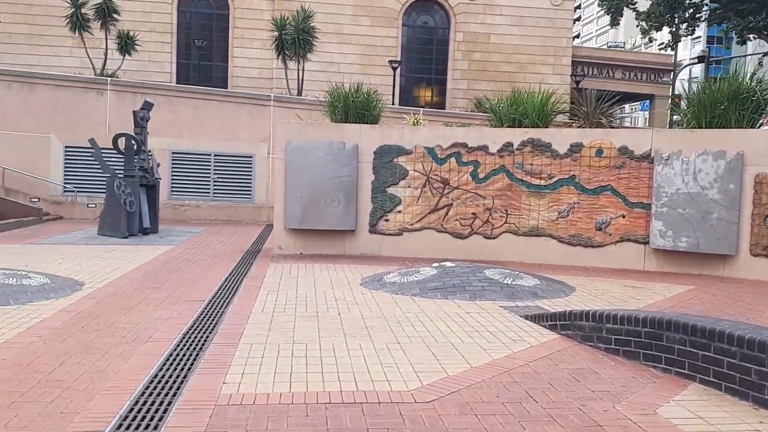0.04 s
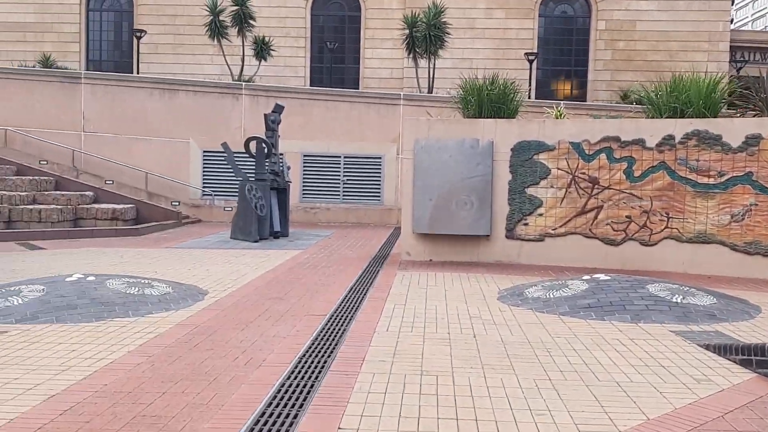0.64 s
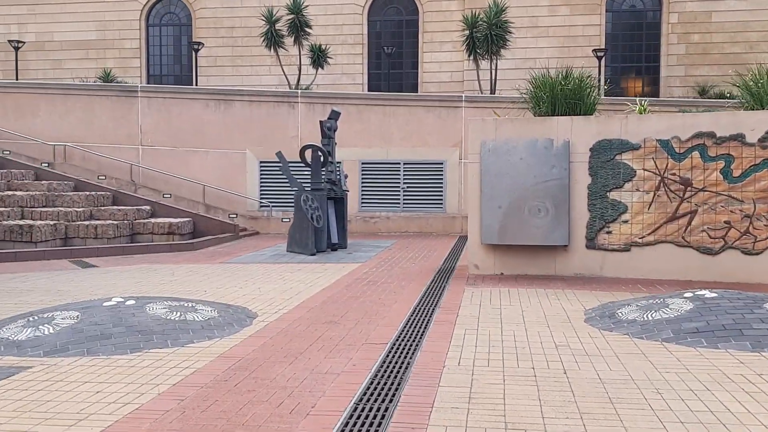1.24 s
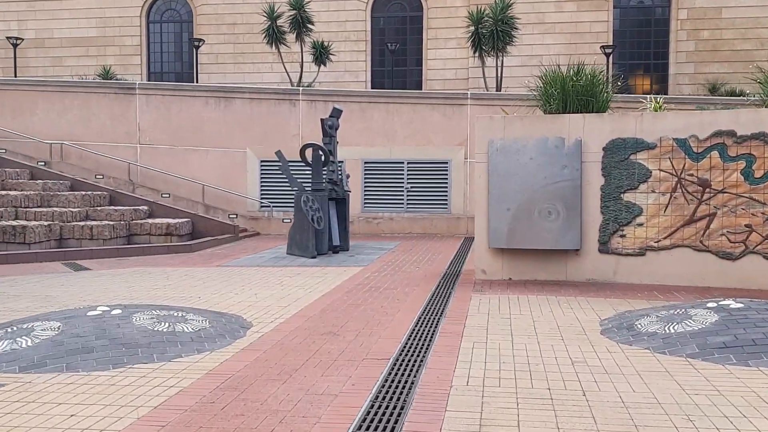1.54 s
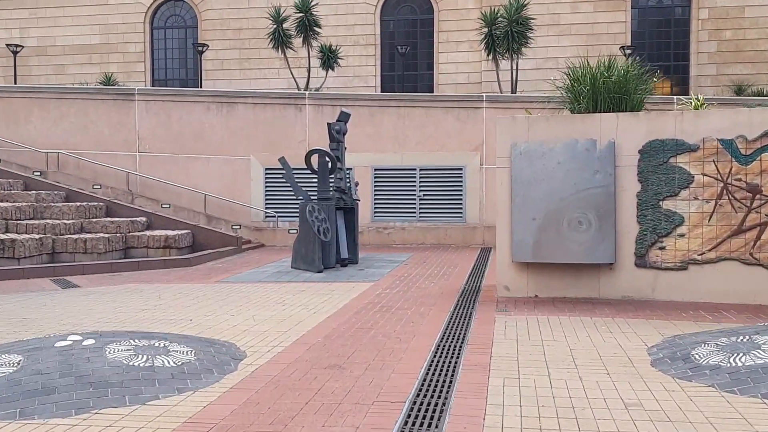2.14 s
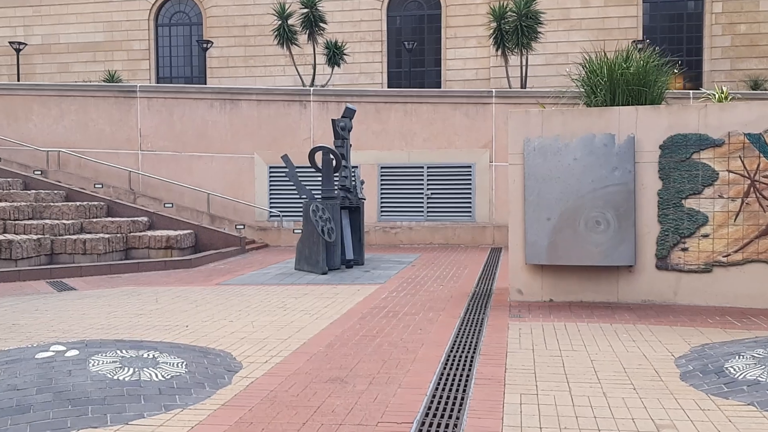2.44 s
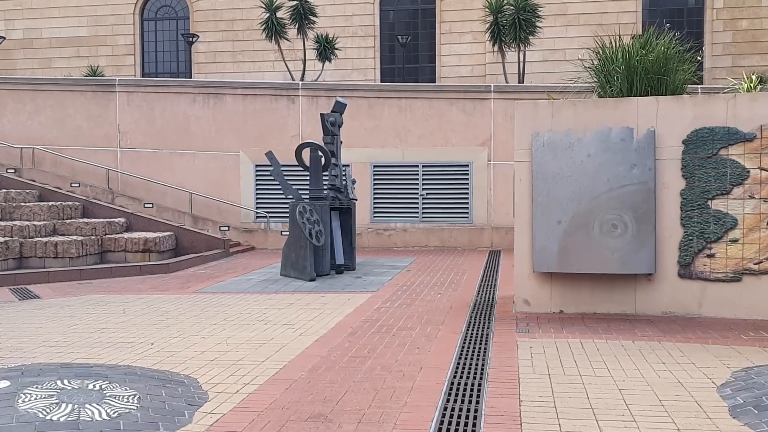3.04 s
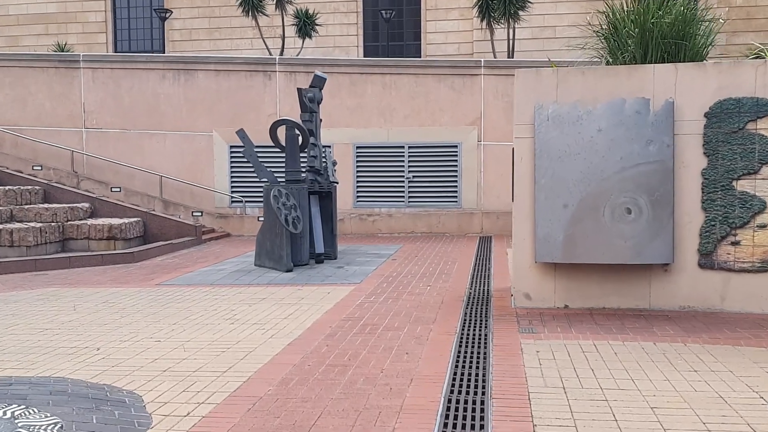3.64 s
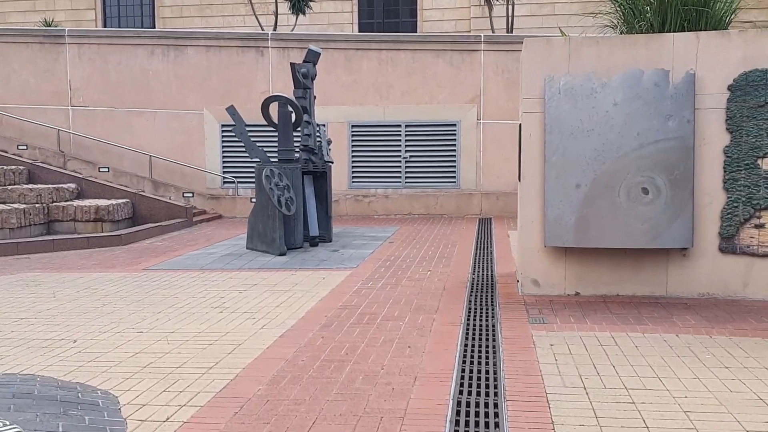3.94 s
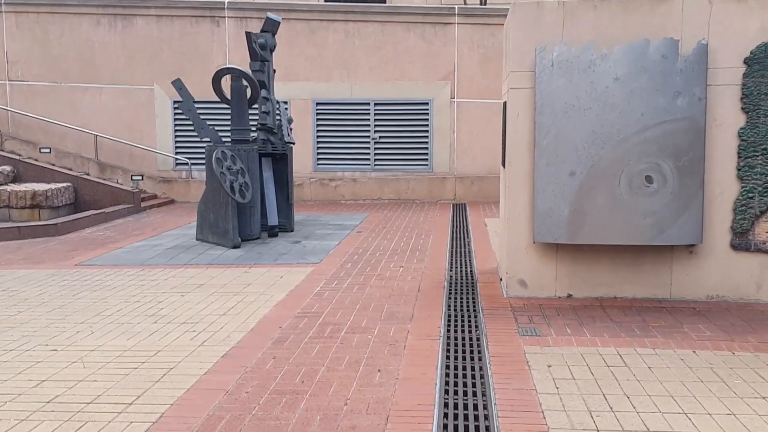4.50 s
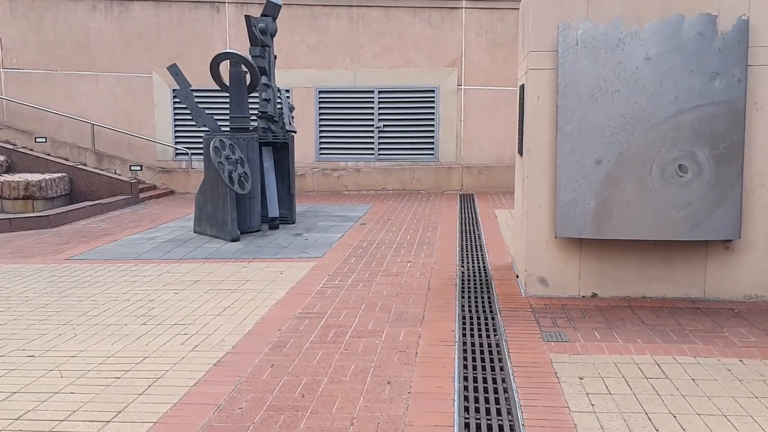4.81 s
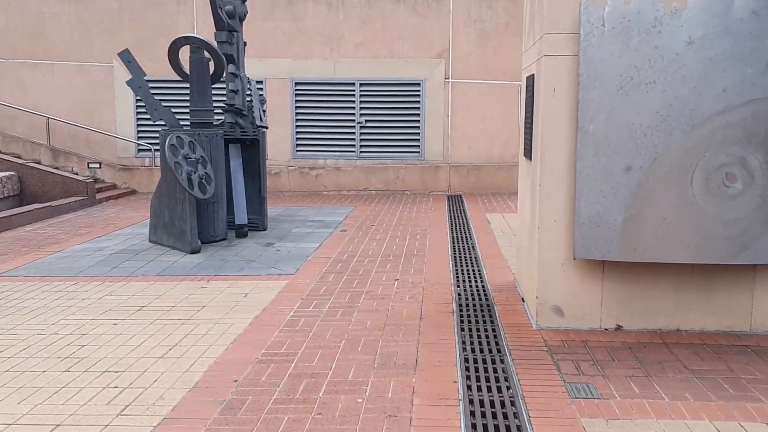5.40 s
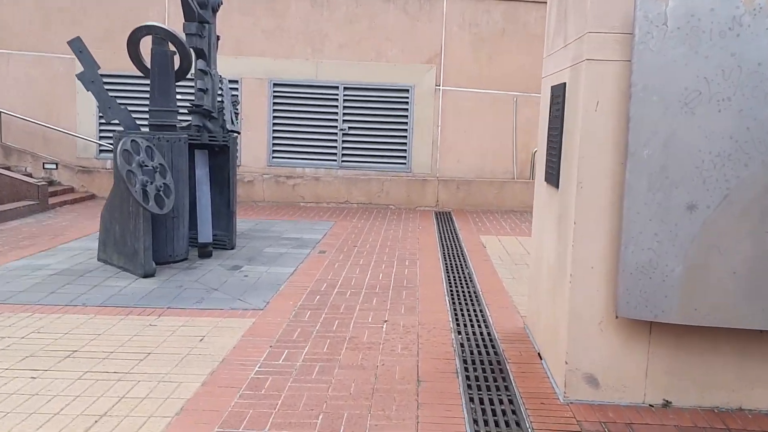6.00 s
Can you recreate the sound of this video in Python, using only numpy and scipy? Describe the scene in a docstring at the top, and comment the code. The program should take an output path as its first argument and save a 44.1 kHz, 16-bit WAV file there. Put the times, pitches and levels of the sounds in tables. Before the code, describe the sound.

A steady, low city hum with a faint far hiss fills a walled plaza throughout. Soft soles scuff quietly on brick close to the microphone, about two steps a second. In the first second, small birds give faint hoarse calls, a quick twitter and a short arched chirp, lightly echoed by the walls. The chirp returns from the left at about 2.5, 3 and 3.4 seconds. At about 3.8 seconds a loose metal drain grate clanks underfoot, rattling and ringing briefly, by far the loudest sound. It knocks dully at 4.4 seconds, then more firmly around 4.9 as it settles. From about 4.8 seconds a light breeze rumbles on the microphone in small gusts. Grit snaps sharply under a shoe near 5.3 seconds, and one more chirp starts at the very end, around 6.2 seconds.

```python
"""A loose metal drain grate clanks under a walker's foot, rings, then knocks back into its seat.
Soft soles scuff the bricks of a walled, paved plaza, and grit snaps under them.
Small birds whistle from above over the steady hum of a city, and the stone walls answer.
Late on a breeze buffets the two microphone ports, which colour the treble differently."""
import sys
import numpy as np
from scipy import signal
from scipy.fft import rfft, irfft, next_fast_len
from scipy.io import wavfile
from scipy.ndimage import uniform_filter1d, minimum_filter1d, map_coordinates

SR = 44100
rng = np.random.default_rng(int(sys.argv[2]) if len(sys.argv) > 2 else 0)


def wav_out(sig):
    """Save sig, one row per channel (or a flat mono array), as 16-bit PCM at SR to the path in sys.argv[1]."""
    wavfile.write(sys.argv[1], SR, np.round(np.clip(np.atleast_2d(sig).T, -1, 1) * 32767).astype(np.int16))


N = 276066

# Levels are relative: each layer has its own trim in the mix.
# The city bed. Each row: time in seconds, traffic level in dB, far hiss level in dB.
CITY_LEVELS = [(0, -47.5, -51), (1.1, -49, -50.5), (1.6, -49, -52.5), (2.2, -46.5, -53),
               (3.3, -48.5, -53.5), (4.7, -50, -55), (5.2, -47.5, -55.5), (5.75, -47, -52),
               (6.26, -47, -54)]
# Noise colours of the bed. Each row: frequency in Hz, level per Hz in dB.
TRAFFIC_COLOUR = [(15, -53), (25, -29), (70, -1), (107, -2), (139, -3.5), (173, -3), (209, -2), (394, -4.5),
                  (528, -9), (782, -13.5), (1030, -18.5), (1500, -17), (1950, -25), (3300, -120)]  # low traffic
HISS_COLOUR = [(530, -12), (900, -2), (1220, -7.5), (1510, -6), (1830, -7), (2040, -4.5), (3030, -3),
               (3320, 1.5), (4480, -15), (4860, -12.5), (7500, -45), (9750, -90), (16500, -120)]  # tyres and leaves
EDDY_COLOUR = [(15, -46), (25, -16), (92, -1), (138, 0), (255, -7), (350, -17), (557, -26), (900, -27),
               (1170, -57), (1980, -120)]  # wind on the ports
# The breeze, picking up near the wall. Each row: time in seconds, level in dB.
BREEZE_LEVELS = [(0, -58), (1.15, -63), (1.8, -49), (2.8, -62), (3.7, -48.5), (4.2, -56.5), (4.7, -56),
                 (4.83, -35), (5.6, -41.5), (6.26, -43)]
# Single gusts. Each row: peak time in seconds, level in dB, half-length in seconds.
GUSTS = [(0.213, -48.5, 0.048), (0.735, -42.5, 0.081), (1.44, -48, .04), (3.431, -37.5, 0.024),
         (5.326, -35.5, 0.027), (5.751, -34.5, 0.028), (5.945, -36.5, 0.027), (6.247, -32.5, 0.023)]

# Hoarse far birds. Each row: start and length in seconds, first and last pitch in Hz, level in dB.
FAR_CALLS = [(0.057, 0.2, 1783, 2003, -46), (.25, 0.055, 1835, 2090, -42), (0.827, .061, 1463, 1820, -43),
             (0.88, 0.083, 3490, 3170, -44), (3.341, 0.076, 1970, 1617, -39)]
# The turns of one bird's zigzag. Each row: time in seconds, pitch in Hz.
TWITTER_TURNS = [(.355, 5800), (.385, 5400), (.402, 4000), (.425, 4200), (.446, 6000), (.458, 4500),
                 (.488, 3450), (.525, 4500)]
# Another bird's arched notes. Each row: crest time in seconds, level in dB, pitch ratio.
CHIRPS = [(.755, -42, .985), (2.549, -41, 1.005), (3.034, -41.5, .99), (3.371, -42, .985),
          (6.267, -34.5, .98)]

# Footsteps, about two a second.
# Each row: peak time in seconds, level in dB, half-length in seconds, share of sand from 0 to 1.
STEPS = [(0.426, -53.5, 0.034, 0.26), (1.24, -51, 0.034, 0.15), (1.782, -52.5, .014, 0.47),
         (2.3, -55, 0.029, 0), (2.805, -53.5, 0.038, .2), (3.276, -56.5, 0.065, 0.12),
         (3.797, -60, 0.044, 0.46), (4.317, -56, .025, 0.33), (4.822, -46, 0.015, 0.22),
         (5.378, -54.5, .029, 0.18), (5.782, -58, 0.12, 0)]
# Noise colours of a scuff. Each row: frequency in Hz, level per Hz in dB.
RUBBER_COLOUR = [(200, -20), (900, -8), (1700, -2), (2150, -6), (2700, -3), (3000, -4), (3400, 0),
                 (3900, -8), (5000, -17), (7000, -40), (15000, -50)]  # the sole dragging
SAND_COLOUR = [(1000, -18.5), (3000, 2.5), (4500, -2), (5700, 7.5), (7300, -27), (9000, -27),
               (11500, -12.5), (15000, -26)]  # the grit under it

# Hits underfoot. Each row: start in seconds, level in dB.
GRATE_SLAMS = [(3.8453, -10.5), (3.851, -9.5), (3.877, -15.5), (3.912, -19.5), (3.96, -28.5)]  # the grate rocking in its frame
GRIT_SNAPS = [(4.2105, -31), (5.2353, -32), (5.2642, -17.5), (5.3283, -42)]
# The seated grate's knocks. Each row: start in seconds, level in dB, low-pass cutoff in Hz.
GRATE_KNOCKS = [(4.446, -30.5, 650), (4.854, -21, 450), (4.87, -21, 4180), (4.92, -26.5, 2900)]
# Ringing modes. Each row: frequency in Hz, level in dB, nominal time to fall 60 dB in seconds.
LOOSE_MODES = [(241, -5, 0.27), (345, -5, 0.26), (381, -7, 0.26), (439, -6, 0.25), (578, -11, 0.24),
               (1088, -14, 0.23), (1173, 0, 0.22), (1220, -8, 0.22), (1299, -10, 0.22), (1340, -13, 0.22),
               (1420, -12, 0.22), (1598, -14, 0.22), (1858, -16, 0.21), (2407, -16, 0.21),
               (2446, -17, 0.21), (2570, -18, 0.2), (2604, -17, 0.2), (2794, -19, 0.2), (2856, -18, 0.2),
               (2986, -19, 0.2), (3075, -12, 0.2), (3137, -19, 0.2), (3175, -11, 0.2), (3239, -17, 0.2),
               (3295, -17, 0.2), (3379, -20, 0.2), (3639, -17, 0.2), (3793, -18, 0.19)]  # bars of the loose grate
GRIT_MODES = [(736, -14, 0.026), (1120, -17, 0.0098), (1660, -14.5, 0.017), (3380, -10, 0.015),
              (5130, -13, 0.0087)]  # a snapping grain
SEATED_MODES = [(298, -3, .11), (390, -6, .08), (500, -1, .08), (790, -13, .07), (950, -4, .07),
                (1460, 0, .1), (1690, -2, .1), (3430, -11, .08)]  # bars of the seated grate
# Noise colours of the hits. Each row: frequency in Hz, level per Hz in dB.
FRAME_COLOUR = [(35, -58), (60, -28), (172, -11), (229, -1), (377, -8), (445, -4), (778, -19), (1080, -13),
                (1170, 3), (1260, -10), (1380, -9), (1510, -17), (1630, -15), (2200, -22), (2860, -52),
                (4840, -120)]  # thud of the frame and its channel
CLINK_COLOUR = [(1000, -28), (1850, -7), (2200, -19.5), (2450, -6), (2800, -8.5), (3100, -5), (3400, -10.5),
                (3750, -8), (4200, -24), (5500, -28.5), (7400, -53), (11000, -53), (15500, -62.5)]  # metal on metal, also the crack of grit
KNOCK_COLOUR = [(35, -38.5), (60, -15), (177, -11.5), (297, 1), (437, -15.5), (962, -13), (1330, -21.5),
                (1470, -21), (3430, -21), (6000, -45), (7800, -87), (13200, -120)]  # thud of the seated grate

# The plaza's reverb. Each row: frequency in Hz, time to fall 60 dB in seconds.
PLAZA_DECAY = [(150, .7), (450, .9), (1200, .55), (3000, 1.5), (4200, 1.7), (5100, 1.4), (6200, .9),
               (9000, .5)]
# Reverb EQ. Each row: frequency in Hz, gain in dB.
WALK_ECHO_EQ = [(400, -15.5), (1200, -16), (3000, -30), (6000, -26)]  # sound from the ground is muffled on its way to the walls
CHIRP_ECHO_EQ = [(3600, -6.0), (5200, -12.5)]  # the long way round costs the note's top most
# Stereo width. Each row: frequency in Hz, left-right likeness from 0 to 1.
STEREO_LIKENESS = [(60, 0.97), (150, 0.96), (300, 0.95), (640, 0.68), (1400, 0), (3000, 0.18), (12000, 0)]
# The tone of the two ports. Each row: frequency in Hz, left minus right in dB.
PORT_BALANCE = [(60, -2), (300, -.5), (1200, -.5), (2000, -3), (2800, -6), (3350, -10), (4100, 0),
                (4800, 8), (5800, 10), (7500, 3), (14000, 1.5)]


def amp(db):
    """Decibels to gain."""
    return 10 ** (np.asarray(db) / 20)


def unit(x):
    """Scale to rms 1."""
    return x / np.sqrt(np.mean(x ** 2) + 1e-20)


def along(points, hz):
    """Read (Hz, value) points on a log frequency axis."""
    freqs, values = np.transpose(points)
    return np.interp(np.log(hz + 1), np.log(freqs + 1), values)


def curves(rows):
    """One automation curve for each column after the time."""
    times, *columns = np.transpose(rows)
    return [np.interp(np.arange(N) / SR, times, column) for column in columns]


def wobble(rate, size=N):
    """A smooth random curve, rate knots a second."""
    knots = rng.standard_normal(int(size * rate / SR) + 4)
    return map_coordinates(knots, [np.arange(size) * rate / SR])


def swell(s, db, half_length):
    """A bell-shaped rise and fall in gain around time s."""
    return amp(db) * np.exp(-((np.arange(N) / SR - s) / half_length) ** 2 / 2)


def filtered(x, response):
    """Shape x with a gain that depends on frequency."""
    n = x.shape[-1]
    padded = next_fast_len(n + 8192)
    return irfft(rfft(x, padded) * response(np.fft.rfftfreq(padded, 1 / SR)), padded)[..., :n]


def eq(x, points):
    """Equalise x along (Hz, dB) points."""
    return filtered(x, lambda hz: amp(along(points, hz)))


def add(track, s, sound):
    """Mix a sound into a track from time s on."""
    part = track[..., round(s * SR):][..., :sound.shape[-1]]
    part += sound[..., :part.shape[-1]]


def diffuse(pair, directness=1):
    """Make two unrelated signals alike in the bass; direct sound stays alike higher up."""
    def mid_side_gains(hz):
        angle = np.arccos(np.clip(along(STEREO_LIKENESS, hz / directness), -1, 1)) / 2
        return np.array([np.cos(angle), np.sin(angle)])
    mid, side = filtered(pair, mid_side_gains)
    return np.array([mid + side, mid - side])


def noise(colour, size=N, directness=1):
    """Stereo noise of rms 1 with the given colour."""
    return unit(diffuse(eq(rng.standard_normal((2, size)), colour), directness))


def city():
    """The bed: traffic hum, far hiss, one droning engine and the microphone's own faint hiss."""
    traffic_db, hiss_db = curves(CITY_LEVELS)
    drift_db = .7 * wobble(5)
    traffic = amp(traffic_db + 4 + drift_db) * noise(TRAFFIC_COLOUR)
    hiss = amp(hiss_db + 5.5 + .92 * wobble(7.8)) * noise(HISS_COLOUR)
    engine_hz = 146 + 1.39 * wobble(4.13)
    engine_gain = amp(-56.5) + swell(s=3.2, db=-50, half_length=.4)
    engine = engine_gain * amp(1.5 * wobble(15)) * np.sin(2 * np.pi * np.cumsum(engine_hz) / SR)
    mic_hiss = amp(-74) * unit(rng.standard_normal((2, N)))
    return traffic + hiss + engine + mic_hiss


def breeze():
    """Eddies buffet each port on its own, the right one harder; gusts ride on the steady flow."""
    flow = amp(curves(BREEZE_LEVELS)[0]) + sum(swell(*gust) for gust in GUSTS)
    eddies = eq(rng.standard_normal((2, N)), EDDY_COLOUR)
    lumps = amp(2.5 * np.array([wobble(30), wobble(30)]))
    return flow * unit(eddies * lumps) * amp([[-2.5], [2]])


def whistle(hz, db, rasp, flutter_db):
    """A bird's tone along a pitch curve, with a fast rasp in pitch and a flutter in level."""
    pitch = hz * (1 + rasp * wobble(500, len(hz)))
    gain = amp(db + flutter_db * wobble(117.8, len(hz)))
    return np.sqrt(2) * gain * np.sin(2 * np.pi * np.cumsum(pitch) / SR)


def near_walls(x, spread_s, count):
    """Early reflections off the nearest walls, different at each port."""
    echoes = np.zeros((2, SR // 4))
    for port in echoes:
        delay = rng.uniform(.00046, spread_s, count)
        port[(delay * SR).astype(int)] = rng.choice([-1, 1], count) * np.exp(-delay / spread_s)
    return signal.fftconvolve(x[None], echoes / np.linalg.norm(echoes[0]), axes=1)[:, :N]


def plaza(x):
    """The reverb tail of the stone walls; each frequency dies at its own speed."""
    hz, t, bands = signal.stft(rng.standard_normal((2, SR + SR // 2)), SR, nperseg=256)
    decay = amp(-60 * t / along(PLAZA_DECAY, hz)[:, None])
    tail = signal.istft(bands * decay, SR, nperseg=256)[1]
    onset = 1 - np.exp(-np.arange(tail.shape[1]) / SR / .0052)
    tail = diffuse(tail * onset)
    return signal.fftconvolve(np.atleast_2d(x), tail / np.linalg.norm(tail[0]), axes=1)[:, :N]


def far_calls():
    """Far birds: hoarse low slurs that arrive wholly by way of the walls."""
    song = np.zeros(N)
    for s, length, start_hz, end_hz, db in FAR_CALLS:
        progress = np.linspace(0, 1, int(length * SR))
        pitch = start_hz + progress * (end_hz - start_hz)
        add(song, s, np.sin(np.pi * progress) * whistle(pitch, db, rasp=200 / pitch, flutter_db=3))
    return amp(-4) * near_walls(song, spread_s=.05, count=30) + amp(-13) * plaza(song)


def twitter():
    """A bird's scratchy zigzag of quick slurs, fading in and out; the high turns are the weakest."""
    song = np.zeros(N)
    times, hz = np.transpose(TWITTER_TURNS)
    pitch = np.interp(np.arange(times[0], times[-1], 1 / SR), times, hz)
    db = -48 - 4 * np.log2(pitch / pitch.mean())
    gate = signal.windows.tukey(len(pitch), .2)
    add(song, times[0], gate * whistle(pitch, db, rasp=.06, flutter_db=4))
    early = amp(-2.5) * near_walls(song, spread_s=.019, count=24)
    return amp(-4.5) * song + early + amp(-10) * plaza(song)


def scuffs():
    """Each sole brushes the brick in a short, grainy swell: part rubber, part sand."""
    rubber, sand = np.zeros((2, N))
    for s, db, half_length, sand_share in STEPS:
        stroke = swell(s, db, half_length)
        rubber += stroke * (1 - sand_share)
        sand += stroke * sand_share
    grain = unit(amp(3.2 * wobble(300)))
    return grain * (amp(9) * rubber * noise(RUBBER_COLOUR) + amp(6.5) * sand * noise(SAND_COLOUR))


def chirps():
    """A bird on the left repeats an arched note, rougher on its flanks; the walls smear and hold it."""
    crest_hz, foot_hz, half_width_s = 5100, 2750, .047  # the arch, before each note's pitch ratio
    rise_s, fall_s, ramp_s = .066, .088, .016
    song = np.zeros(N)
    t = np.arange(-rise_s, fall_s, 1 / SR)
    arch = 1 / (1 + (t / half_width_s) ** 2)
    gate = np.clip(np.minimum(t + rise_s, fall_s - t) / ramp_s, 0, 1)
    effort_db = np.interp(t, [0, ramp_s], [-3, 0])  # softer going up than coming down
    rasp = .01 + .04 * (1 - arch)
    for s, db, ratio in CHIRPS:
        pitch = ratio * (foot_hz + (crest_hz - foot_hz) * arch)
        add(song, s - rise_s, gate * whistle(pitch, db + effort_db, rasp, flutter_db=4))
    early = amp(-2.5) * near_walls(song, spread_s=.034, count=18)
    late = eq(plaza(song), CHIRP_ECHO_EQ)
    return song * amp([[-2], [-7]]) + early + late


def chatter(blows, gap_s, loss_db, count):
    """Each blow bounces into a quick run of ever weaker contacts."""
    return [(s + k * gap_s, db - k * loss_db, *rest) for s, db, *rest in blows for k in range(count)]


def fade(t60, attack):
    """Half a second of envelope: a quick rise, then a fall of 60 dB every t60 seconds."""
    t = np.arange(SR // 2) / SR
    return amp(-60 * t / t60) * (1 - np.exp(-t / attack))


def burst(colour, t60, attack, directness=1):
    """The noise of an impact: a sharp front and a fast decay."""
    return noise(colour, SR // 2, directness) * fade(t60, attack)


def ring(modes, damping):
    """Struck modes, rebalanced on every hit; higher ones reach the ports further out of step."""
    hz, db, t60 = np.transpose(modes)[:, :, None]
    t = np.arange(SR // 2) / SR
    strength = amp(db + rng.standard_normal(hz.shape))
    phase = 2 * np.pi * hz * t + rng.uniform(0, 2 * np.pi, hz.shape)
    skew = rng.choice([-1, 1], hz.shape) * np.minimum((hz / 2800) ** 2, np.pi / 4)
    decay = strength / np.linalg.norm(strength) * amp(-60 * t * damping / t60)
    return np.array([(decay * np.sin(phase + side * skew)).sum(0) for side in (-1, 1)])


def grate_clank():
    """The loose grate slams and chatters: every contact thuds and clinks, hard ones ring the bars."""
    hits = np.zeros((2, N))
    hardest_db = max(db for s, db in GRATE_SLAMS)
    underfoot = fade(t60=.7, attack=.002)
    for s, db in chatter(GRATE_SLAMS, gap_s=.0095, loss_db=5.5, count=3):
        force_db = db - hardest_db  # a light contact only grazes the frame and hardly flexes the bars
        thud = amp(1) * burst(FRAME_COLOUR, t60=.1, attack=.00022, directness=4.5)
        bars = amp(3 + .88 * force_db) * ring(LOOSE_MODES, damping=.97) * underfoot
        clink = amp(-1.5 + .39 * force_db) * burst(CLINK_COLOUR, t60=.1, attack=.00087, directness=1.5)
        add(hits, s, amp(db) * (thud + bars + clink))
    # the hollow of the drain booms along; the deep bass below about 90 Hz is cut away
    boom = amp(-6) * signal.lfilter(*signal.iirpeak(242, Q=7, fs=SR), hits)
    low_cut = signal.butter(2, 90, "high", fs=SR, output="sos")
    return signal.sosfilt(low_cut, hits + boom)


def grit_snaps():
    """A grain of grit snaps with a tiny crack and a very short ring, muffled by the sole."""
    snaps = np.zeros((2, N))
    for s, db in GRIT_SNAPS:
        crack = amp(-3) * burst(CLINK_COLOUR, t60=.0034, attack=.0001)
        add(snaps, s, amp(db) * (ring(GRIT_MODES, damping=1.1) + crack))
    muffle = signal.butter(6, 5000, fs=SR, output="sos")
    return signal.sosfilt(muffle, snaps)


def grate_knocks():
    """Weighed down, the grate only knocks, one end after the other; a cushioned contact is duller."""
    knocks = np.zeros((2, N))
    for s, db, cutoff_hz in chatter(GRATE_KNOCKS, gap_s=.0065, loss_db=3, count=2):
        bars = amp(1.5) * ring(SEATED_MODES, damping=1) * fade(t60=3.3, attack=.00065)
        thud = amp(1.5) * burst(KNOCK_COLOUR, t60=.12, attack=.0005, directness=2.5)
        soften = signal.butter(1, cutoff_hz, fs=SR)
        add(knocks, s, amp(db) * signal.lfilter(*soften, bars + thud))
    return knocks


def scene():
    """The mix: the walk up close with its echo, over birds, city and breeze."""
    walk = grate_clank() + grate_knocks() + grit_snaps() + scuffs()
    echo = eq(plaza(walk), WALK_ECHO_EQ)
    return walk + echo + chirps() + twitter() + far_calls() + city() + breeze()


def record(dry):
    """The right port resonates in the low treble, the left reaches higher; then a limiter and top cut."""
    def ports(hz):
        tilt = amp(along(PORT_BALANCE, hz) * np.array([[.5], [-.5]]))
        return tilt / np.sqrt(np.mean(tilt ** 2, axis=0))
    ceiling, top_hz = .97, 15750
    coloured = filtered(dry, ports)
    needed_gain = ceiling / np.maximum(np.abs(coloured).max(axis=0), ceiling)
    smooth_gain = uniform_filter1d(minimum_filter1d(needed_gain, size=200), size=200)
    return filtered(coloured * smooth_gain, lambda hz: hz < top_hz)


dry = scene()
out = record(dry)
wav_out(out)
```